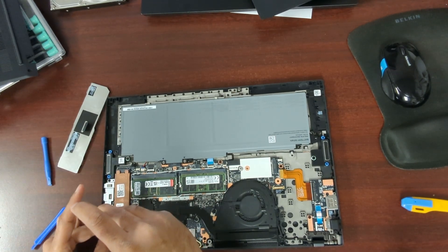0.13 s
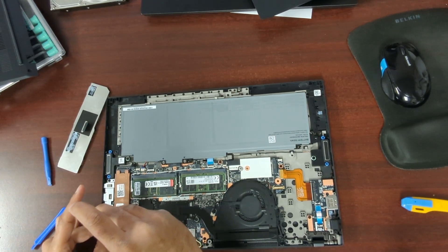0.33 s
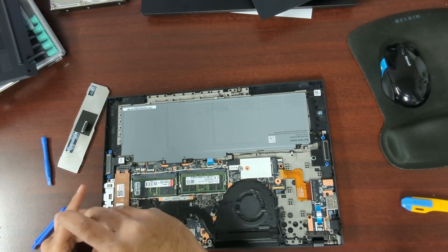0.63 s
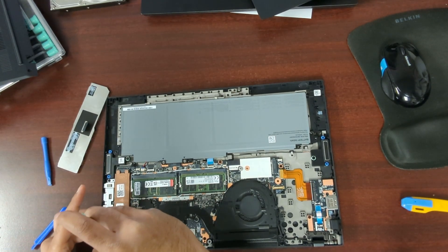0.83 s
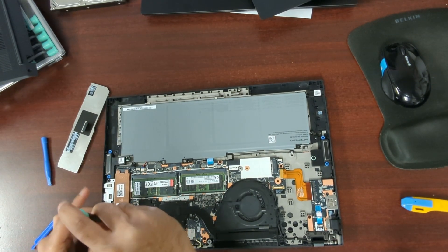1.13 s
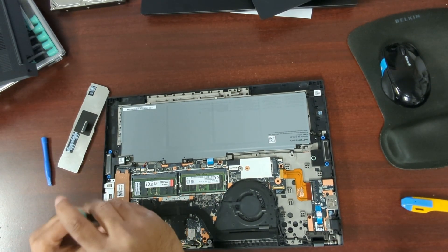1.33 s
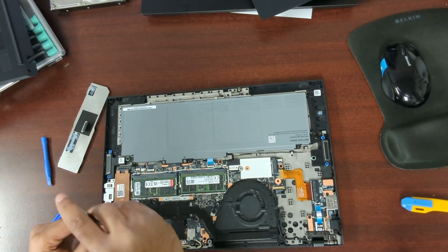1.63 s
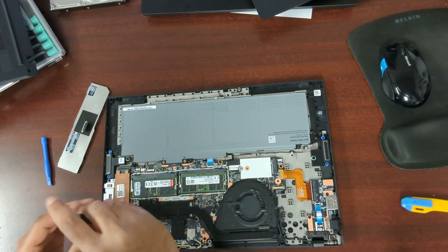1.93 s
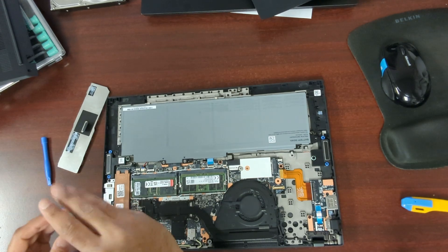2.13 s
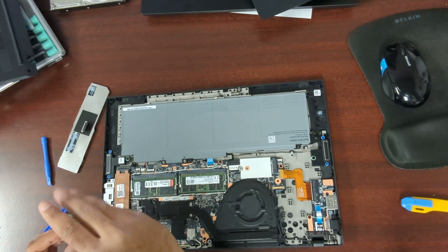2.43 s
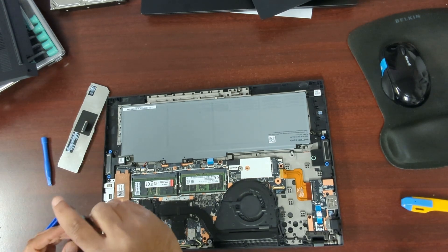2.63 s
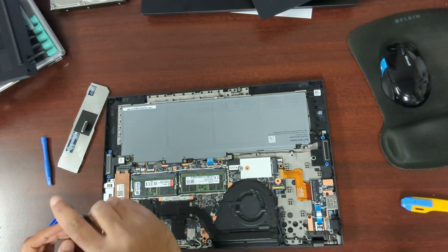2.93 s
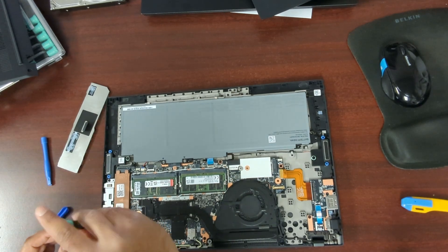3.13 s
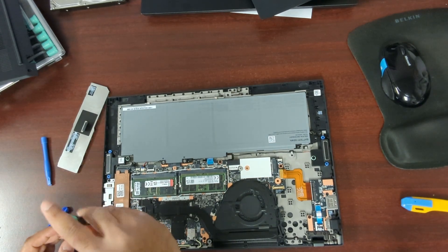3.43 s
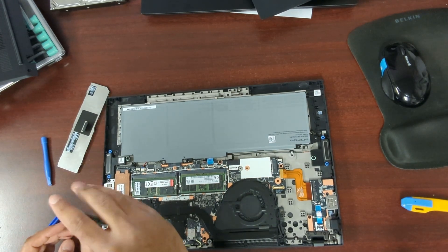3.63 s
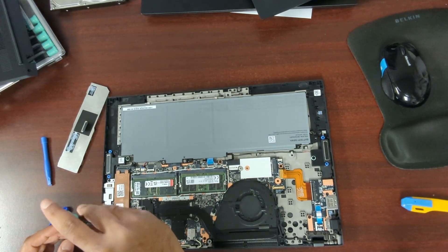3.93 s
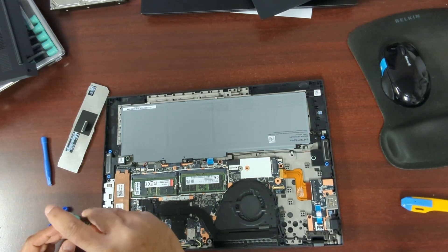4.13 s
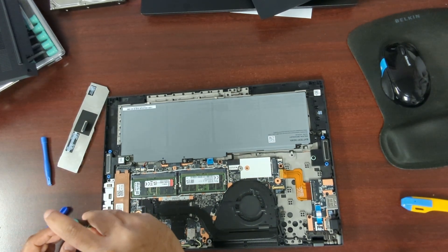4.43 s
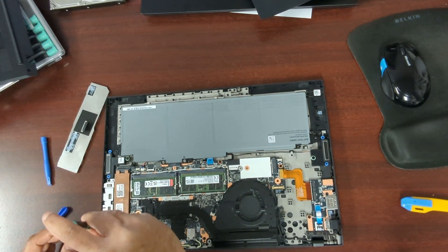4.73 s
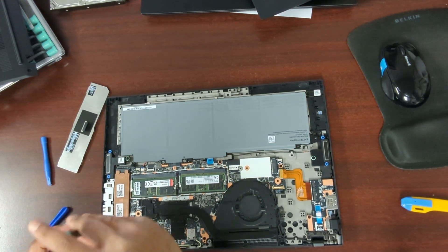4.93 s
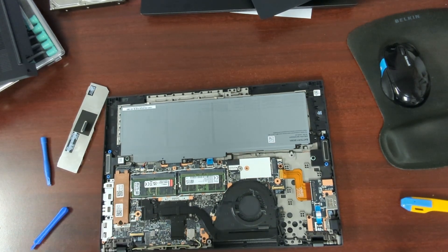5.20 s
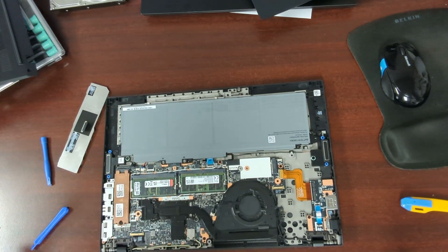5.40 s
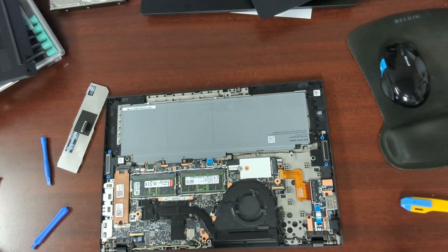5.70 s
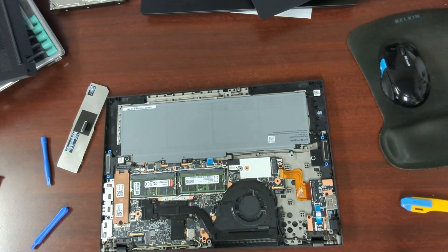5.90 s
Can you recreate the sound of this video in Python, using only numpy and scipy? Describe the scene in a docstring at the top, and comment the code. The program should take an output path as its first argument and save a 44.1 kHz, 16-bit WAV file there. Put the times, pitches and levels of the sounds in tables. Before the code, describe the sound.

A small, quiet room with unsteady low rumble and faint steady hiss, heard in stereo near a wooden desk. At 0.1 s a light click sits over a soft bump. Around 0.9-1.0 s a few clicks and dull bumps follow, one crisp; at 1.45 s comes the sharpest early click. Between 1.7 and 2.3 s there are small clicks, deeper soft thumps and a brief rustle. From 2.5 to 4 s it is sparser: weak ticks of parts, muffled bumps and low rubbing. Soft bumps return at 4.35-4.7 s, with a small click near 4.5. A distant clock ticks very faintly at 0.8, 1.8, 2.8, 3.8 and 4.8 s. At 5.7 s a tool's tip knocks the desk at left, then at 5.86 s its handle lands much louder with a short woody plastic ring, a bright bounce and a brief gritty slide to the end.

```python
"""A sharp click over a soft bump comes first, then more clicks, bumps and rubbing.
Hands work a plastic pry tool inside an open laptop on a wooden desk, in a small quiet room.
Each blow is shaped noise with a tone and echoes; a clock ticks faintly five times across the room.
Near the end a tool is set down, tip then handle; each end knocks and rings, then it bounces and slides.
Under it all lies filtered noise: a swaying room rumble and a steady hiss."""
import sys
import numpy as np
from scipy import signal
from scipy.fft import rfft, irfft, next_fast_len
from scipy.io import wavfile
from scipy.ndimage import uniform_filter1d

SR = 44100
rng = np.random.default_rng(int(sys.argv[2]) if len(sys.argv) > 2 else 0)


def dump(signal):
    """Clip the signal to [-1, 1] and save it as 16-bit WAV at the path in sys.argv[1]."""
    limited = np.clip(np.atleast_2d(signal).T, -1, 1)
    pcm = np.round(limited * 32767).astype(np.int16)
    wavfile.write(sys.argv[1], SR, pcm)


N = 267246  # length of the scene in samples
T = np.arange(SR // 3) / SR  # time within one blow, in seconds

# Clicks of tool and parts; the last row is the set-down tool's bright bounce.
# ring_db is how far the resonance stands out:
# [start_s, level_db, body_db, treble_db, resonance_hz, ring_db]
CLICKS = [(.0840, -52, 2, -21.5, 3030, 5.5), (0.897, -52, 8.5, -26.5, 2070, 6),
          (0.979, -40, -3, -20, 3080, 8), (1.061, -73.5, 4, -16, 3230, 10), (1.4244, -58, 0, -21, 1390, 1),
          (1.4507, -34, -6, -16, 2890, 9), (1.689, -69.5, -1, -25, 2670, 3),
          (1.7882, -49.5, -2, -33.5, 2240, 0), (2.0063, -50, -5, -29, 2510, 3),
          (2.0725, -63.5, 6.5, -27, 1340, -0.5), (2.255, -51, -14, -21.5, 4200, 19),
          (2.563, -65, 0, -23, 3020, 7), (2.868, -57, -9.5, -19, 1240, 18),
          (3.1805, -72.5, 12.5, -12, 3200, 15), (3.28, -76, 2, -19, 3000, 12),
          (4.4813, -52, -15, -17.5, 4100, 1.5), (5.0223, -61, 6, 8, 3050, 19.5),
          (5.351, -81, -0.5, -6, 3330, 12), (5.8855, -42, -5, 2, 9900, 27)]
# A firm click is clean, a weak one is mostly rattle:
# the rattle of a middling click, and how much it falls for each dB of click level
MIDDLING_DB, RATTLE_DB, RATTLE_FALL = -51, -6, 0.49


def clicks(snap_s=0.00039, rattle_t60_s=0.037, ring_width=0.15, wet_db=-2.0,
           low_db=-14, low_mid_db=-7, top_db=-15.5):
    """Clicks of tool and parts, each coloured by a resonance; the last is the set-down tool's bounce."""
    out = np.zeros((2, N))
    for start_s, level_db, body_db, treble_db, resonance_hz, ring_db in CLICKS:
        shape = [(150, body_db + low_db), (750, body_db + low_mid_db), (1300, body_db), (2300, 0.96),
                 (3300, treble_db / 10), (4700, treble_db / 2), (6000, treble_db),
                 (11500, treble_db), (15500, treble_db + top_db)]

        def tone_db(hz):
            """Broad tone plus a bell-shaped peak at the resonance."""
            distance = np.log((hz + 1) / resonance_hz) / ring_width
            return read(shape, hz) + ring_db * np.exp(-distance ** 2 / 2)

        rattle_db = RATTLE_DB - RATTLE_FALL * (level_db - MIDDLING_DB)
        dry_click = contact(snap_s, rattle_db, rattle_t60_s)
        click = in_room(dry_click, wet_db, size_factor=0.54, desk_db=1, desk_t60_s=0.019)
        add(out, start_s, level_db, colour(click, tone_db))
    return out


# Fingers and tool bump the chassis or desk: [start_s, level_db, deep_thump_db]
BUMPS = [(0.08, -48.5, -14.5), (0.901, -50, -10), (0.984, -47.5, 20), (1.427, -60.5, -2),
         (1.449, -44.5, 0.5), (1.793, -49, 7), (2.016, -46, 10), (2.072, -48.5, 10), (2.948, -57.5, 10.5),
         (3.178, -52.5, 18.5), (3.308, -58.5, 20), (3.808, -54, 14.5), (4.352, -50, 7), (4.488, -49.5, 9.5),
         (4.678, -53, 12), (5.209, -69.5, -10), (5.720, -47, -14), (5.868, -37.5, -1.5), (6.014, -46, 1)]
# The fleshier the bump, the deeper its thump and the lower its knock
KNOCK_HZ, KNOCK_OCTAVES_PER_DB, SETTLE_S = 376, 0.02, 0.13


def bumps(snap_s=0.0021):
    """Soft blows: the chassis knocks around one low resonance and the desk thumps under it."""
    out = np.zeros((2, N))
    for start_s, level_db, thump_db in BUMPS:
        pitch_hz = KNOCK_HZ * 2 ** (-KNOCK_OCTAVES_PER_DB * thump_db)
        shape = [(30, thump_db - 22.0), (110, thump_db),
                 (0.65 * pitch_hz, -6), (pitch_hz, 0), (1.3 * pitch_hz, -4), (2.1 * pitch_hz, -22),
                 (4000, -52), (12000, -72)]
        bump = in_room(contact(snap_s, 5.5, SETTLE_S), wet_db=-2.5)
        add(out, start_s, level_db, colour(bump, lambda hz: read(shape, hz), order=15))
    return out


# The tool meets the desk, tip then handle; t60 is the time to fall 60 dB, levels are before the
# small left-right offset: [start_s, level_db, rattle_db, rattle_t60_s, ringing_db]
LANDINGS = [(5.7133, -26, 2, 0.025, -12.5), (5.8634, -17.5, -9, 0.2, -3)]
# Tone of the tip's knock on the wood: [frequency_hz, level_db]
TIP_TONE = [(20, -41), (70, 2.5), (170, -36), (380, 7), (600, -19.5), (800, 7.5), (980, -7.5), (1300, 1),
            (2300, 1), (4500, -5.5), (7000, -16.5), (10800, -14.5), (13000, -21.5), (15500, -26)]
# Tone of the handle's knock on the wood: [frequency_hz, level_db]
HANDLE_TONE = [(20, -53), (80, -5.5), (160, -28.5), (300, -3.5), (540, -9), (640, -8.5), (780, -2.5),
               (1450, 2.5), (1900, -1), (2700, -4.5), (4600, -19.5), (8000, -28.5), (10200, -21.5),
               (15500, -32)]
# What the tip rings with on the desk: [pitch_hz, relative_level_db, t60_s]
TIP_MODES = [(388, -4, .2), (818, 0, .2), (1933, -1, .15), (2417, 0, .15), (2772, -3, .15), (3262, 0, .1),
             (4334, -8, .11)]
# What the handle rings with on the desk: [pitch_hz, relative_level_db, t60_s]
HANDLE_MODES = [(318, -12, .25), (552, -5, .17), (756, 1, .18), (1070, -7, .15), (1182, -5, .17),
                (1320, -4, .17), (1360, -3, .17), (1461, -2, .16), (1520, -2, .16), (1616, -5, .16),
                (1730, -2, .17), (2128, -3, .15), (2390, -6, .13), (2688, -2, .14), (3034, -11, .15),
                (6304, -18, .11), (9948, -14, .11)]


def landings(snap_s=0.001, lead_s=0.00031, left_db=0.5):
    """Each end of the tool chatters on the wood and rings with its modes, off to the left."""
    out = np.zeros((2, N))
    port_time = np.array([T, T - lead_s])  # the right port hears the ringing later
    ends = zip(LANDINGS, (TIP_TONE, HANDLE_TONE), (TIP_MODES, HANDLE_MODES))
    for (start_s, level_db, rattle_db, rattle_t60_s, ringing_db), shape, modes in ends:
        chatter = in_room(contact(snap_s, rattle_db, rattle_t60_s), wet_db=3.5, lead_s=lead_s)
        knock = colour(chatter, lambda hz: read(shape, hz))
        ring = np.zeros((2, len(T)))
        for pitch_hz, mode_db, t60_s in modes:
            turns = pitch_hz * port_time + rng.random()  # random starting phase
            ring += amp(mode_db) * dying(t60_s) * np.sin(2 * np.pi * turns)
        ring *= 1 - np.exp(-T / snap_s)  # soft start
        add(out, start_s, level_db, knock + amp(ringing_db) * unit(ring))
    return out * amp([[left_db], [-left_db]])


# Hands shift and rub over the parts; in the last row the tool slides or rolls brightly on the desk.
# Levels are before the jerks and the swell:
# [start_s, length_s, dull_rumble_db, rustle_db, rustle_treble_boost_db]
RUBS = [(0.18, 0.26, -70, -77, 1), (0.423, 0.65, -65, -100, -7), (1.785, 0.12, -60, -55.5, 3),
        (2.049, 0.51, -62, -79.5, 0.5), (2.489, 1.45, -61.5, -85.5, 0), (3.68, 1.8, -64, -100, -3),
        (5.45, 0.6, -65.5, -76.5, -9.5), (5.948, 0.22, -50, -59.5, 8)]
# Tone of the dull rumble: [frequency_hz, level_db]
RUMBLE_TONE = [(30, -10.5), (70, 10), (125, 2), (200, -15.5), (350, -18), (700, -31), (2000, -57),
               (8000, -56.5)]
# Tone of the rustle, before the treble boost: [frequency_hz, level_db]
RUSTLE_TONE = [(100, -8.5), (600, 1.5), (1400, -1), (2300, -2.5), (4000, -4.5), (5500, -18), (15000, -26)]
RUB_RISE_S, RUB_FALL_S, RUSTLE_TREBLE_HZ = 0.094, 0.17, 5400


def rubs(lumpy_db=7.0, lumps_per_s=30, rustle_follows=0.42, grit_db=1.5, grit_per_s=250):
    """Hands rub the parts and at last the tool slides or rolls: jerky dull rumble and gritty rustle."""
    t = np.arange(N) / SR
    out = np.zeros((2, N))
    jerks_db = lumpy_db * wander(lumps_per_s)
    rumble = amp(jerks_db) * steady(RUMBLE_TONE)
    rustle_moves_db = rustle_follows * jerks_db + grit_db * wander(grit_per_s)
    rustle = amp(rustle_moves_db) * steady(RUSTLE_TONE)
    high_pass = signal.butter(1, RUSTLE_TREBLE_HZ, "high", fs=SR, output="sos")
    treble = signal.sosfilt(high_pass, rustle)
    for start_s, length_s, rumble_db, rustle_db, treble_db in RUBS:
        end_s = start_s + length_s
        on = slice(round(start_s * SR), round(end_s * SR))
        rise = (t[on] - start_s) / RUB_RISE_S
        fall = (end_s - t[on]) / RUB_FALL_S
        motion = np.clip(np.minimum(rise, fall), 0, 1)
        rubbing = rustle[:, on] + (amp(treble_db) - 1) * treble[:, on]
        out[:, on] += motion * (amp(rumble_db) * rumble[:, on] + amp(rustle_db) * rubbing)
    return out


# Level of each clock tick in turn: [level_db]
TICKS_DB = [-71, -52, -66, -62.5, -58.5]
# Tone of the clock: [frequency_hz, level_db]
CLOCK_TONE = [(200, -23), (750, -21), (1150, 8), (1400, 0.5), (1600, -5.5), (1850, 1.5), (2600, -6.5),
              (5500, -21), (15000, -26.5)]
FIRST_TICK_S, TICK_PERIOD_S = 0.8142, 1


def clock(swell_s=0.017, spread_s=0.018):
    """The escapement whirs briefly in its case, swelling and fading; distance smears each tick."""
    out = np.zeros((2, N))
    for k, level_db in enumerate(TICKS_DB):
        swell = np.exp(-((T - swell_s) / spread_s) ** 2 / 2)
        whir = rng.standard_normal(len(T)) * swell
        tick = colour(in_room(whir, wet_db=-7, size_factor=0.83), lambda hz: read(CLOCK_TONE, hz))
        add(out, FIRST_TICK_S + k * TICK_PERIOD_S, level_db, tick)
    return out


# Tone of the room's rumble and hiss: [frequency_hz, relative_level_db]
HUM_TONE = [(20, -29.5), (35, -19), (50, -2), (66, 0), (85, -7.5), (120, -17), (150, -30), (178, -13),
            (220, -26), (400, -27.5), (700, -36.5), (3300, -44.5), (6500, -52.5), (15500, -57)]
HUM_DB = -64.5  # overall level before the rumble sways


def background(sway_db=5.0, sways_per_s=30):
    """Room rumble that sways over steady hiss."""
    room = amp(HUM_DB) * steady(HUM_TONE)
    low_pass = signal.butter(2, 300, fs=SR, output="sos")
    rumble = signal.sosfiltfilt(low_pass, room)
    sway = amp(sway_db * wander(sways_per_s))
    return room + (sway - 1) * rumble


def contact(snap_s, rattle_db, t60_s):
    """A crack that swells and fades within a few times snap_s, then a dense rattle of touching parts."""
    crack, rattle = rng.choice([-1., 1.], (2, len(T)))
    crack = unit(crack * T * np.exp(-T / snap_s))
    return crack + amp(rattle_db) * unit(rattle * dying(t60_s))


# How long the room's echo lasts, before size_factor scales it: [frequency_hz, t60_s]
ROOM = [(100, 0.44), (350, 0.25), (700, 0.23), (1500, 0.25), (3500, 0.2), (8000, 0.16), (15000, 0.18)]


def in_room(x, wet_db, lead_s=0.00018, size_factor=0.88, desk_db=5.0, desk_t60_s=0.02, gap_s=0.0016):
    """Direct sound, lead_s earlier at the left, quick scatter off desk and chassis, then the room's tail."""
    hz, t, bands = signal.stft(diffuse(len(T)), SR, nperseg=256)
    fade = dying(size_factor * read(ROOM, hz)[:, None], t)  # each pitch range dies at its own rate
    tail = signal.istft(bands * fade, SR, nperseg=256)[1][:, :len(T)]
    tail = tail * (1 - np.exp(-T / gap_s))  # the tail builds up over gap_s
    scatter = diffuse(len(T), dying(desk_t60_s)) * (T < T[-1] / 2)
    echoes = amp(desk_db) * unit(scatter) + amp(wet_db) * unit(tail)
    later = np.pad(x, (round(lead_s * SR), 0))[:len(x)]
    return np.array([x, later]) + signal.fftconvolve(x[None], echoes, axes=1)[:, :len(T)]


# Left-right likeness of sound from all sides: [frequency_hz, likeness (1 = identical)]
LIKENESS = [(50, .995), (200, .98), (450, .92), (900, .35), (2000, 0), (15000, 0)]


def diffuse(count, envelope=1):
    """Noise from all directions: alike at both ports mainly in the bass."""
    a, b = rfft(rng.standard_normal((2, count)) * envelope)
    same = np.clip(read(LIKENESS, np.fft.rfftfreq(count, 1 / SR)), -1, 1)
    return irfft(np.array([a, same * a + np.sqrt(1 - same ** 2) * b]), count)


def steady(shape):
    """Diffuse noise of rms 1 with the given spectrum."""
    size = next_fast_len(N, True)
    gain = amp(read(shape, np.fft.rfftfreq(size, 1 / SR)))
    noise = irfft(rfft(diffuse(size)) * gain, size)[:, :N]
    return np.sqrt(N) * unit(noise)


def wander(per_s):
    """Random curve: straight lines between per_s new values a second, drawn with spread 1."""
    return np.interp(np.arange(N) / SR * per_s, np.arange(N), rng.standard_normal(N))


def colour(x, db_at, size=4096, order=25):
    """Causal filter that gives the blow x the broad spectrum db_at(Hz) and keeps its fine detail."""
    power = np.mean(abs(np.fft.fft(x, size)) ** 2, 0)
    power = uniform_filter1d(power, order, mode="wrap")
    wanted = amp(db_at(abs(np.fft.fftfreq(size, 1 / SR))))
    log_gain = np.log(wanted / np.sqrt(power))
    # minimum phase: the filter acts as early as it can
    response = np.exp(np.conj(signal.hilbert(log_gain)))
    taps = np.fft.ifft(response).real[:size // 2]
    return unit(signal.fftconvolve(x, taps[None], axes=1)[:, :len(T)])


def add(mix, start_s, level_db, sound):
    """Place a blow; level_db is its level when its energy is spread over 20 ms."""
    part = mix[:, max(round(start_s * SR), 0):][:, :sound.shape[1]]
    part += amp(level_db) * np.sqrt(SR / 50) * unit(sound)[:, :part.shape[1]]


def dying(t60_s, t=T):
    """Envelope that falls 60 dB in t60_s."""
    return np.exp(-np.log(1000) * t / np.maximum(t60_s, 1e-4))


def amp(db):
    """Decibels to gain."""
    return 10 ** (np.asarray(db) / 20)


def unit(x):
    """Scale to an average energy of 1 per channel."""
    return x / np.sqrt(np.mean(np.sum(x ** 2, -1)) + 1e-30)


def read(points, hz):
    """Read a table on a log-frequency axis."""
    f, value = np.transpose(points)
    return np.interp(np.log(hz + 1), np.log(f + 1), value)


def scene():
    """All sources at the two microphone ports."""
    return clicks() + bumps() + landings() + rubs() + clock() + background()


# How much louder the left port is than the right: [frequency_hz, left_minus_right_db]
BALANCE_DB = [(100, 1.5), (800, 1.5), (1700, 0.3), (3400, 3), (6500, 3.5), (10000, 2.5), (15000, 5)]
EDGE_HZ = 15900  # upper limit of the sound


def record(dry):
    """The left port is brighter than the right; then a low-pass filter limits the band."""
    size = next_fast_len(N + 4096)
    tilt_db = read(BALANCE_DB, np.fft.rfftfreq(size, 1 / SR))
    gain = amp(np.array([tilt_db, -tilt_db]) / 2)  # half the difference on each side
    ports = irfft(rfft(dry, size) * gain, size)[:, :N]
    low_pass = signal.firwin(255, EDGE_HZ, window=("kaiser", 8), fs=SR)
    return signal.oaconvolve(ports, low_pass[None], "same")


dry = scene()
out = record(dry)
dump(out)
```